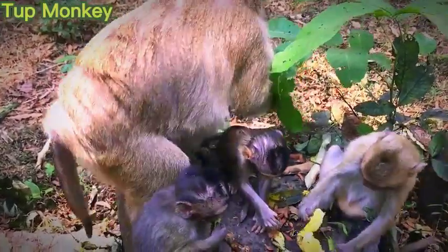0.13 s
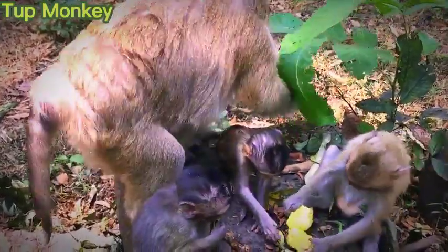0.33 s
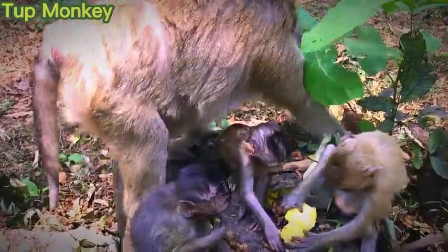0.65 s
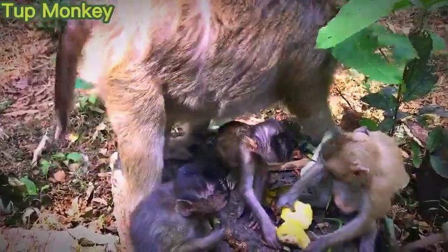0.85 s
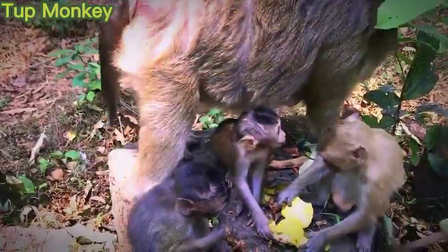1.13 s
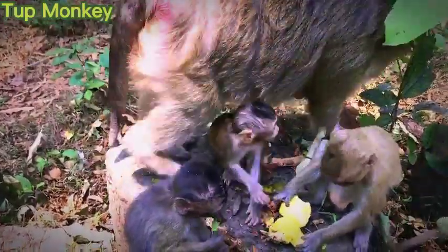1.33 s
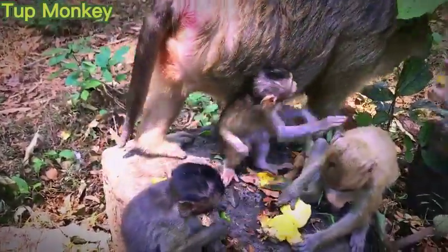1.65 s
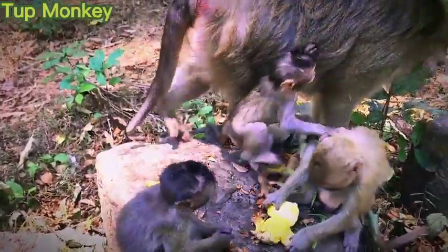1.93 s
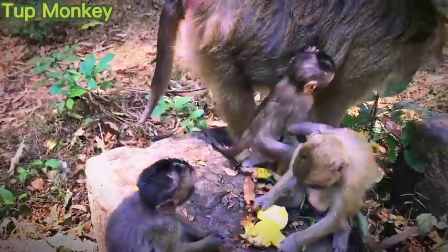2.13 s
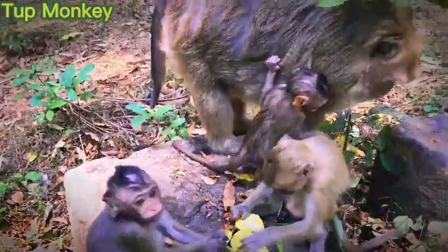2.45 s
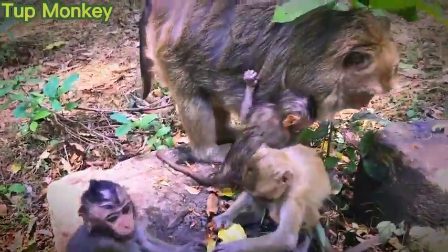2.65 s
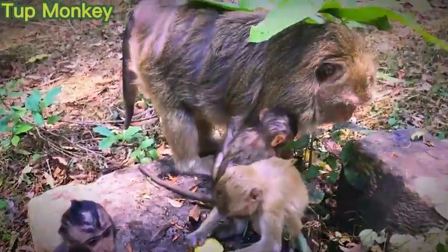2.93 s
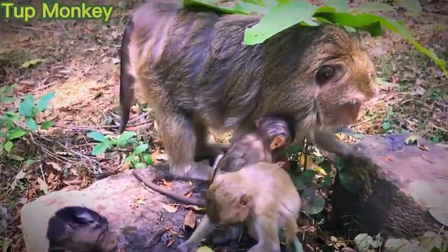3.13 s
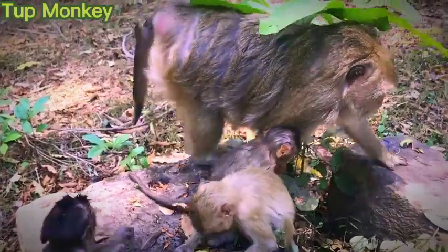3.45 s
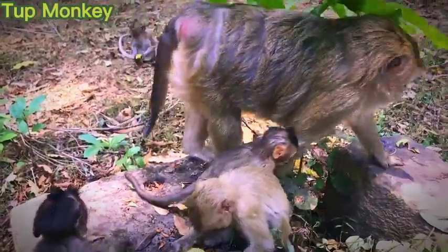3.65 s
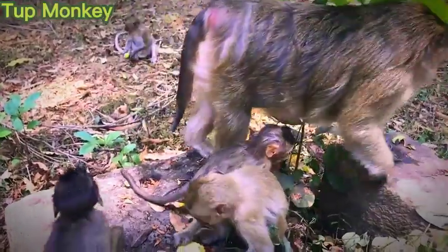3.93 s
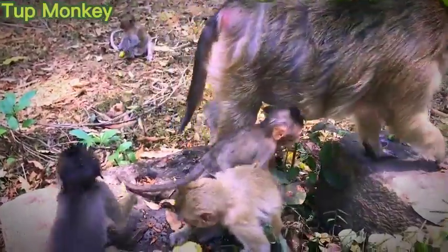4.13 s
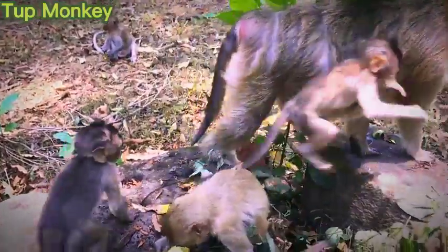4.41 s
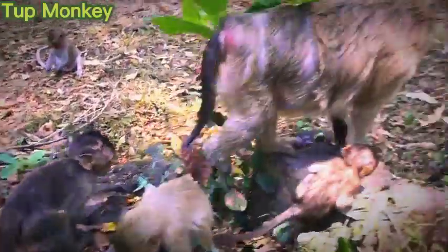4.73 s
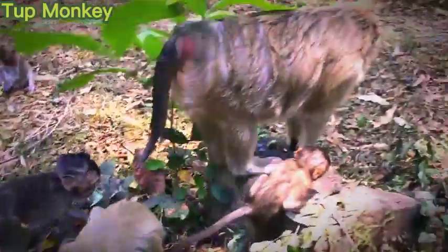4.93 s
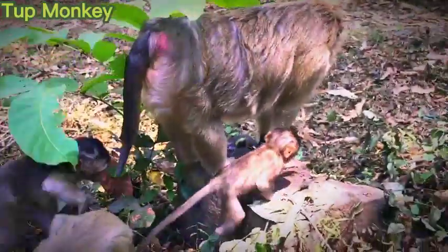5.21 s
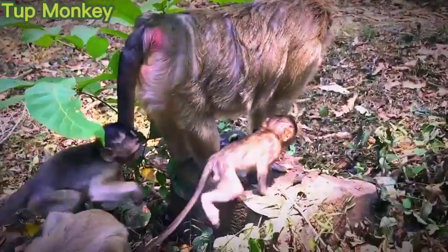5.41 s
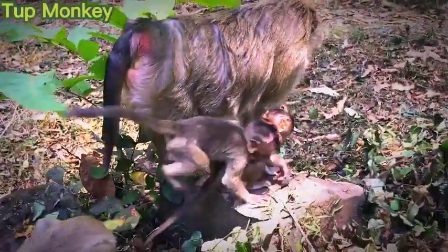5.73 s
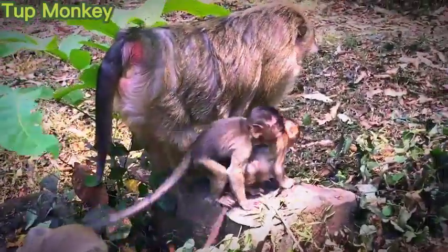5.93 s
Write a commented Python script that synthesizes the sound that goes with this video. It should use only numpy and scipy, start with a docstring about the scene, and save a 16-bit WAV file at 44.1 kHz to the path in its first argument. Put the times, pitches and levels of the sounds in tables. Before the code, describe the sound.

Dry outdoor close-up, with very little echo. Small animals step through brittle leaves: faint fidgeting and one woody knock at first, a cluster of crunchy rustles, a calmer pause, then a busy scramble of crackles, clicks and dull pats. One snap stands out sharply before the movement eases. Low air rumble, soft hiss and a wavering distant motor stay far behind.

```python
"""Monkeys shift, step and scramble over dry leaf litter on a forest floor, heard from close by.
Crowds of tiny noise bursts, ringing like leaves, make the crackle; single longer bursts snap stalks.
Feet pat down as short dull rings, and early on something hollow clacks as a set of fading tones.
Behind them a far engine drones as wavering tones, under the quiet shaped noise of the open air."""
import sys
import numpy as np
from scipy import signal
from scipy.fft import rfft, irfft
from scipy.io import wavfile
from scipy.ndimage import uniform_filter1d

SR = 44100
rng = np.random.default_rng(int(sys.argv[2]) if len(sys.argv) > 2 else 0)


def dump(signal):
    """Clip the signal to [-1, 1] and save it as 16-bit WAV at the path in sys.argv[1]."""
    limited = np.clip(np.atleast_2d(signal).T, -1, 1)
    pcm = np.round(limited * 32767).astype(np.int16)
    wavfile.write(sys.argv[1], SR, pcm)


N = 267687
TIME = np.arange(N) / SR  # seconds

# The far engine's tones. Each row: whole multiple of the firing rate, level in dB.
ENGINE_TONES = [(2, -62), (3, -68), (4, -67), (5, -68.5), (6, -69.5), (7, -71), (8, -77.5), (12, -84)]
FIRING_HZ = 33.13

# The colour of the open air. Each row: frequency in Hz, relative strength in dB per Hz.
AIR_SPECTRUM = [(20, -36), (32, -18), (44, 3), (56, 1.5), (90, -1.5), (150, -6.5), (250, -16.5),
                (320, -19.5), (390, -19.5), (500, -22.5), (1200, -21), (2400, -24.5), (5000, -30.5),
                (10400, -38), (12500, -36.5), (16000, -41)]
AIR_DB = -57

# The tones of the hollow clack. Each row: frequency in Hz, relative level in dB,
# time to fade by 60 dB in seconds.
CLACK_TONES = [(482, -14.5, 0.015), (650, -19, 0.017), (935, -15.5, .018), (1064, -6.5, 0.023),
               (1470, 0.5, 0.014), (1730, -2, 0.01), (2140, -6, 0.014), (2620, -20, .012),
               (3620, -10, 0.026), (4190, -13, .022), (4600, -10, 0.02), (6840, -7, .014),
               (8080, -7.5, 0.011)]
CLACK_S, CLACK_DB = 0.3888, -23.5  # start in seconds, level added to every tone in dB

# Hands and feet landing. Each row: time in seconds, relative level in dB, ring in Hz.
FOOT_PATS = [(2.219, -53.5, 405), (2.441, -52, 1090), (2.776, -55, 1520), (2.885, -53, 438),
             (3.525, -50.5, 1400), (3.982, -51.5, 1400), (4.378, -48, 1410), (4.579, -41, 1070),
             (4.726, -43.5, 1306), (5.577, -50, 1406), (5.86, -50, 1150), (5.89, -53, 1360),
             (6.002, -47, 1038)]

# Leaves and stalks breaking, loud ones and some faint ones that stand alone.
# Each row: start in seconds, level in dB, ring in Hz,
# sharpness of the ring (Q, with a floor of 0.2), crumbling time in seconds.
SINGLE_SNAPS = [(0.234, -46, 4300, 0.23, 0.00062), (0.3879, -29.5, 4270, .9, 0.0024),
                (0.3912, -33, 3800, 1.1, 0.00091), (0.4531, -47, 5350, 1.7, .0009),
                (0.549, -50.5, 11000, 1, 0.00089), (1.3702, -47.5, 3150, 4.5, .0006),
                (1.441, -42.5, 4900, 0.64, 0.0092), (1.4811, -45, 2440, 0.32, 0.0016),
                (1.518, -39, 11900, 2.5, 0.0028), (1.5398, -34.5, 4440, 0.17, 0.0027),
                (1.86, -44, 5460, 11, 0.00048), (2.1658, -43, 5030, 1.5, 0.003),
                (2.219, -37.5, 3000, 0.72, 0.0037), (2.293, -47.5, 4900, 0.79, 0.0013),
                (2.3344, -45, 4500, 1, 0.0028), (2.5917, -41, 5820, 2.6, 0.0014),
                (3.089, -45.5, 3800, .4, 0.0025), (3.376, -46, 4870, 1.2, 0.00092),
                (3.912, -45.5, 8020, 0.81, 0.0012), (3.4856, -34, 8605, 12.2, 0.0018),
                (3.487, -38, 3350, 1.5, 0.0025), (3.971, -46, 3980, 4, .0006),
                (3.982, -37.5, 3700, 1.5, .002), (4.143, -40, 4900, 0.8, 0.0013),
                (4.221, -41, 5360, 1.8, 0.0054), (4.273, -35, 6140, 4, .0014),
                (4.3176, -40, 5100, 2.2, .0006), (4.435, -43, 4290, 1.4, 0.0015),
                (4.4697, -41, 2740, 0.5, 0.0051), (4.5398, -45.5, 5000, 1.6, .0022),
                (4.5643, -34.5, 3580, 2.3, .003), (4.58, -31.5, 5070, 6, .0029),
                (4.6134, -32, 3940, 1.36, 0.0043), (4.6735, -37, 5700, 14.4, 0.00086),
                (4.7261, -36, 1510, 0.15, 0.0041), (4.7328, -34.5, 4800, 1.2, 0.0016),
                (4.817, -40.5, 13160, 2.64, 0.00044), (4.8486, -33.5, 4850, 0.62, 0.0022),
                (4.8608, -35.5, 9820, 6, 0.00033), (5.073, -35.5, 8200, 3.6, 0.00051),
                (5.1164, -41, 4500, 0.53, 0.002), (5.1968, -41.5, 2876, 0.61, 0.0014),
                (5.2274, -35, 8500, 2.8, .0011), (5.246, -30.5, 4140, 4, 0.0028),
                (5.2537, -30.5, 4780, 0.45, 0.0014), (5.3335, -33, 2900, 1.2, 0.0022),
                (5.36, -37, 4700, 1.2, .0016), (5.424, -37, 4640, 5.6, 0.00056),
                (5.4359, -38, 3900, 4.4, 0.0021), (5.447, -19, 4410, 4.2, 0.00064),
                (5.4489, -34, 2300, 1.2, 0.0021), (5.512, -38.5, 3700, 2.2, .0045),
                (5.5438, -38, 4640, 1.5, 0.0025), (5.566, -37.5, 4000, 1.4, .002),
                (5.5789, -38.5, 2810, 0.31, 0.0016), (5.7479, -38.5, 4680, 1.5, 0.00043),
                (5.818, -41.5, 4300, 1.3, 0.0043), (5.9148, -39.5, 2930, 2.1, 0.0016)]

# The colour of crackling leaves. Each row: frequency in Hz, relative strength in dB per Hz.
LEAF_SPECTRUM = [(150, -22), (420, -6), (800, -3), (1300, 0), (2100, -0.5), (3000, 0.5), (4000, 2),
                 (5600, 0), (7400, -2.5), (8800, -1.5), (10400, -7), (12000, -2.5), (15500, -4)]

# Steps and sweeps of a limb through the litter. Each row: middle in seconds,
# length between the half-strength points in seconds, strength of the stirring in dB,
# treble tilt in dB, ring of the bent leaves in Hz.
LIMB_MOVES = [(0.196, 0.13, -67.5, 6, 9000), (0.394, .15, -62.5, 7, 4500), (0.753, 0.047, -60, -3, 4400),
              (0.951, 0.14, -65, -2, 3080), (1.181, 0.15, -67.5, 3, 5480), (1.402, 0.045, -55.5, 2, 3620),
              (1.537, 0.05, -48.5, 1, 3960), (1.661, .034, -45, 1, 5900), (1.746, 0.4, -59.5, 4, 6000),
              (1.798, .065, -53, 6, 5600), (2.016, .11, -53.5, 6.5, 6050), (2.205, .07, -43.5, 3, 9000),
              (2.5, 0.04, -61, -5, 4000), (2.598, 0.043, -53, -5, 6000), (2.685, 0.087, -61.5, -4, 5500),
              (3.037, 0.19, -60, 1, 6220), (3.42, 0.11, -53, 3, 4190), (3.516, 0.072, -48, 2.5, 7100),
              (3.851, .14, -57, 8.5, 5830), (4.191, 0.13, -56.5, -1, 6420), (4.274, 0.02, -42.5, 10, 4120),
              (4.36, 0.074, -51.5, 7.5, 5890), (4.585, 0.018, -40, -2, 5800),
              (4.619, .03, -37.5, 0.5, 5260), (4.681, 0.12, -50.5, -1, 5800), (4.87, 0.21, -54.5, -5, 6000),
              (4.986, 0.1, -52.5, 5, 9090), (5.065, 0.034, -54, 1, 8640), (5.342, 0.046, -42, 8.5, 3894),
              (5.393, 0.074, -52.5, -7, 2714), (5.463, 0.069, -46.5, -1.5, 2504),
              (5.583, .032, -46, 2.5, 4300), (5.678, 0.22, -55.5, -1.5, 4140),
              (6.051, 0.04, -52, -8.5, 5860)]
SWELL_STEEPNESS, SETTLE_STEEPNESS = 5.5, 3.5  # how sharply a move swells and dies away

# Light fidgeting between the moves, which grows as the group sets off.
# Each row: time in seconds, strength of the stirring in dB.
FIDGETING = [(0, -80.5), (0.7, -70.5), (1.3, -68), (2.2, -63), (2.88, -70.5), (3.2, -65), (3.7, -67.5),
             (4.45, -59.5), (5.5, -60.5), (6.07, -65)]
FIDGET_TILT_DB, FIDGET_HZ = 1, 4270  # treble tilt and leaf ring while fidgeting
USUAL_STIR_DB = -55.5  # the stirring at which the stated rates of breaks hold
BAND_EDGE_HZ = 15780


def amp(db):
    """Turns decibels into gain."""
    return 10 ** (np.asarray(db) / 20)


def unit(x):
    """Scales a sound to an rms (average strength) of one."""
    return x / np.sqrt(np.mean(x ** 2) + 1e-20)


def read(points, hz):
    """Reads a spectrum in dB between its points, on a log-frequency axis."""
    point_hz, db = np.transpose(points)
    return np.interp(np.log(hz + 1), np.log(point_hz), db)


def add(mix, start_s, sound):
    """Mixes a sound in at a given time."""
    part = mix[max(round(start_s * SR), 0):][:len(sound)]
    part += sound[:len(part)]


def wander(hz):
    """Slow random drift of rms one, mostly slower than hz."""
    f = np.fft.rfftfreq(N, 1 / SR)
    keep_slow = (f > 0) / (1 + (f / hz) ** 4)
    return unit(irfft(rfft(rng.standard_normal(N)) * keep_slow, N))


def colour(x, points, size=4096):
    """Gives a sound a spectrum with no pre-echo, so that clicks keep their sharp fronts."""
    db = read(points, np.fft.rfftfreq(size, 1 / SR))
    cepstrum = irfft(np.log(amp(db)))
    # folding the cepstrum forward in time gives the filter that responds soonest
    cepstrum[1:size // 2] *= 2
    cepstrum[size // 2 + 1:] = 0
    response = irfft(np.exp(rfft(cepstrum)))
    return signal.oaconvolve(x, response)[:N]


def ring(x, hz, q):
    """One damped resonance: a struck thing rings near one pitch, longer for a higher q."""
    padded = 2 * len(x)
    s = 1j * np.fft.rfftfreq(padded, 1 / SR) / hz
    resonance = s / (s + max(q, 0.2) * (s * s + 1))
    return irfft(rfft(x, padded) * resonance)[:len(x)]


def fracture(t, crumble_s, first):
    """A first break followed by a dying shower of smaller ones."""
    shower = rng.standard_normal(len(t)) * np.exp(-t / crumble_s)
    shower /= np.linalg.norm(shower)
    shower[0] = first
    return shower


def air(swell_db=1.5):
    """Distant rumble and soft hiss: shaped noise that slowly swells and sinks."""
    shape = amp(read(AIR_SPECTRUM, np.fft.rfftfreq(N, 1 / SR)))
    noise = irfft(rfft(rng.standard_normal(N)) * shape, N)
    return amp(AIR_DB) * unit(noise) * amp(swell_db * wander(1.75))


def engine(waver=0.0198, fade_db=3.5):
    """Multiples of a far engine's firing rate, wavering in speed and fading on the way."""
    cycles = np.cumsum(FIRING_HZ * (1 + waver * wander(4.48))) / SR
    drone = np.zeros(N)
    for multiple, db in ENGINE_TONES:
        tone = np.sin(2 * np.pi * (round(multiple) * cycles + rng.random()))
        drone += amp(db) * unit(tone * amp(fade_db * wander(17.6)))
    return drone


def undergrowth(x, wet_db=-19, t60=0.073, size=12000):
    """Faint echoes scattered from stones, stems and foliage, dying out within moments."""
    t = np.arange(size) / SR
    sparse = (rng.random(size) < 0.06) * (t > 0.003)
    echoes = rng.standard_normal(size) * sparse * amp(-60 * t / t60)
    return x + amp(wet_db) * signal.oaconvolve(x, echoes / np.linalg.norm(echoes))[:N]


def clack(rise_s=0.00031, size=4096):
    """The short ring of a hollow body after a sharp knock: many tones fading together."""
    out, t = np.zeros(N), np.arange(size) / SR
    tones = np.zeros(size)
    for hz, db, t60 in CLACK_TONES:
        tones += amp(db - 60 * t / t60) * np.sin(2 * np.pi * (hz * t + rng.random()))
    add(out, CLACK_S, amp(CLACK_DB) * tones * (1 - np.exp(-t / rise_s)))
    return out


def pats(level_db=-13, q=6.0, press_s=0.0031, lag_s=0.00093, size=2048):
    """A hand or foot presses the packed litter with a short dull pat."""
    out, t = np.zeros(N), np.arange(size) / SR
    for start_s, db, hz in FOOT_PATS:
        press = fracture(t, press_s, first=0.22)
        pat = ring(ring(press, hz, q), hz, 0.52)
        add(out, start_s + lag_s, amp(db + level_db) * unit(pat))
    return out


def stirring():
    """Adds the power of all moves; the stronger a move, the more it sets the tilt and ring."""
    fidget_db = np.interp(TIME, *np.transpose(FIDGETING))
    power, colours = [amp(fidget_db) ** 2], [(FIDGET_TILT_DB, FIDGET_HZ)]
    for middle, length, db, tilt_db, hz in LIMB_MOVES:
        away = abs(TIME - middle) / (length / 2)
        steepness = np.where(TIME < middle, SWELL_STEEPNESS, SETTLE_STEEPNESS)
        power.append((amp(db) / (1 + away ** steepness)) ** 2)
        colours.append((tilt_db, hz))
    total = sum(power)
    tilt_db, leaf_hz = np.transpose(colours) @ np.array(power) / total
    return np.sqrt(total), tilt_db, leaf_hz


def chance_snaps(stir, per_s=22, crowding=0.4, over_db=4.5, follow=0.61, spread_db=2,
                 ring_hz=5000, octaves=0.49, q=1.88, crumble_s=0.0025, count=200):
    """More breaks at chance moments, more often and louder where the litter is stirred."""
    effort = stir / amp(USUAL_STIR_DB)
    breaks_due = np.cumsum(per_s * effort ** crowding) / SR  # running count
    places = np.searchsorted(breaks_due, np.arange(count) + 2 * rng.random(count))
    rows = []  # same columns as the single snaps
    for at, (loud, high) in zip(places, rng.standard_normal((count, 2))):
        if at < N:
            db = USUAL_STIR_DB + over_db + follow * 20 * np.log10(effort[at]) + spread_db * loud
            rows.append((at / SR, db, ring_hz * 2 ** (octaves * high), q, crumble_s))
    return rows


def snaps(stir, clean_s=0.00091, tail_db=-15, tail_s=0.004, low_hz=700, focus=0.12, size=1024):
    """Each break rings its own leaf or stalk; the shorter it crumbles, the cleaner the click."""
    out, t = np.zeros(N), np.arange(size) / SR
    small_body = signal.butter(2, low_hz, "high", fs=SR, output="sos")  # little bass from small things
    for start_s, db, hz, q, crumble_s in SINGLE_SNAPS + chance_snaps(stir):
        drive = unit(fracture(t, crumble_s, first=clean_s / crumble_s))
        drive += amp(tail_db) * unit(fracture(t, tail_s, first=0))  # neighbouring leaves shiver
        snap = ring(ring(drive, hz, q), hz, focus * q)  # stiff stalks keep near one pitch
        snap = signal.sosfilt(small_body, snap)
        snap *= np.sqrt(SR / 1000) / np.linalg.norm(snap)  # energy of 1 ms at rms one
        add(out, start_s, amp(db) * snap)
    return out


def leaf_patches(x, leaf_hz, depth_db=2.5, ring_db=3, octaves=0.13, size=512):
    """Leaves under the limb ring near one pitch; each favours its bands for some hundredths of a second."""
    f, t, z = signal.stft(x, SR, nperseg=size)
    patches = rng.standard_normal(z.shape)
    # smooth across pitch twice, then across time
    for width, axis in ((7, 0), (4, 0), (7, 1)):
        patches = uniform_filter1d(patches, size=width, axis=axis)
    off_pitch = np.log2((f[:, None] + 1) / np.interp(t, TIME, leaf_hz)) / octaves
    gain_db = depth_db * unit(patches) + ring_db / (1 + off_pitch ** 2)
    return signal.istft(z * amp(gain_db), nperseg=size)[1][:N]


def rustle(stir, tilt_db, leaf_hz, level_db=-1.5, per_s=1000, spread_db=3.6, crowding=0.48,
           scrape_db=-5.5, clump_db=1.12, q=1.58, crumble_s=0.0022, count=64, size=256):
    """Tiny breaks in many leaves, thicker and louder with stirring, over the scrape of leaf on leaf."""
    rate = per_s * (stir / amp(USUAL_STIR_DB)) ** crowding  # breaks per second
    at = np.flatnonzero(rng.random(N) < rate / SR)
    force = amp(spread_db * np.minimum(rng.exponential(1, N), 3.5))[at]
    force /= np.sqrt(rate[at])  # crowding alone adds no power: the stirring sets the level
    leaf = rng.integers(0, count, N)[at]
    t = np.arange(size) / SR
    grains = np.zeros(N + size)
    for k, hz in enumerate(np.linspace(1200, 15000, count)):
        grain = unit(ring(fracture(t, crumble_s, first=0.26), hz, q * np.sqrt(hz / 3000)))
        mine = leaf == k
        np.add.at(grains, at[mine, None] + np.arange(size), force[mine, None] * grain)
    crackle = unit(grains[:N]) + amp(scrape_db) * rng.standard_normal(N)
    crackle = leaf_patches(colour(crackle, LEAF_SPECTRUM), leaf_hz)
    crackle = unit(crackle * amp(clump_db * wander(31)))
    # each move has its own balance of treble and bass
    low = signal.sosfilt(signal.butter(1, 6500, fs=SR, output="sos"), crackle)
    tilt = amp(tilt_db / 2)
    return amp(level_db) * stir * (low / tilt + (crackle - low) * tilt)


def scene():
    """The monkeys' movements, with echoes from the undergrowth, over the far background."""
    stir, tilt_db, leaf_hz = stirring()
    close_by = rustle(stir, tilt_db, leaf_hz) + snaps(stir) + pats() + clack()
    return (undergrowth(close_by) + engine() + air())[None]


def record(dry):
    """The recorder's band limit: a steep filter takes away the highest treble."""
    band_limit = signal.firwin(401, BAND_EDGE_HZ, window=("kaiser", 8), fs=SR)
    return signal.oaconvolve(dry, band_limit[None], "same")


dry = scene()
out = record(dry)
dump(out)
```